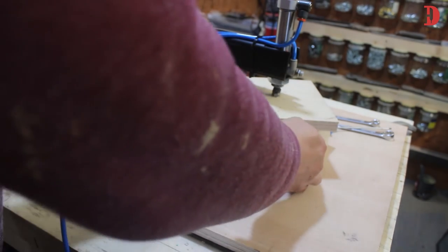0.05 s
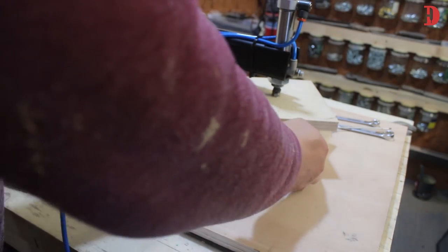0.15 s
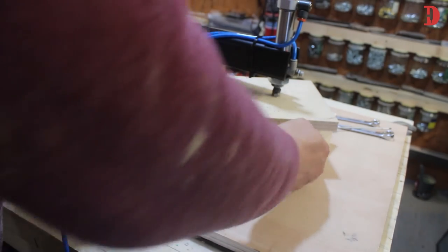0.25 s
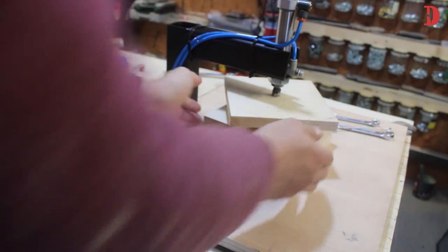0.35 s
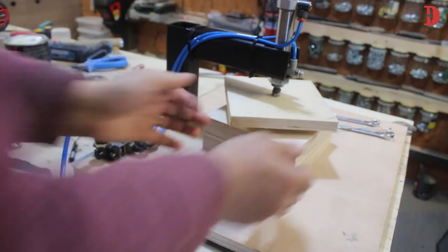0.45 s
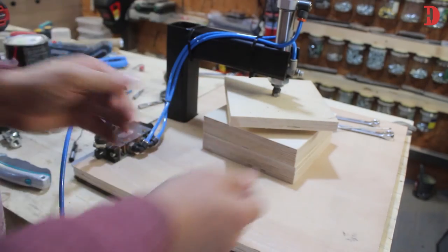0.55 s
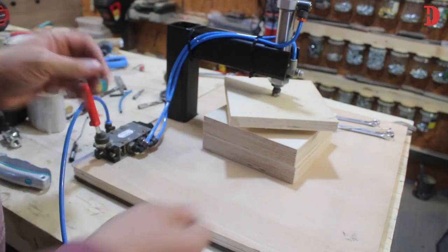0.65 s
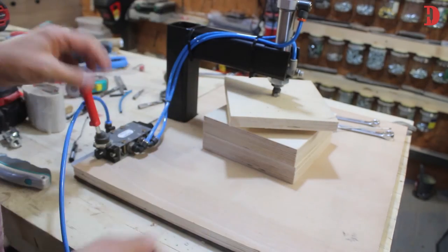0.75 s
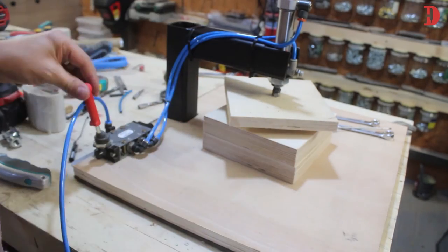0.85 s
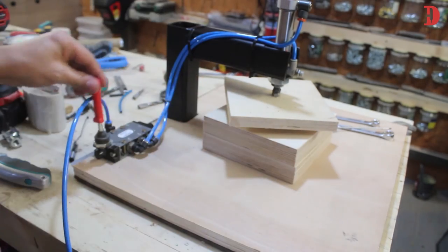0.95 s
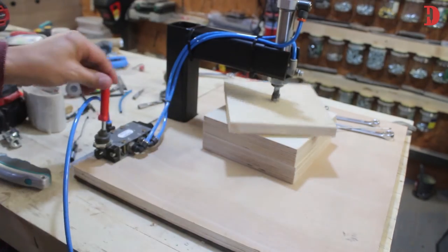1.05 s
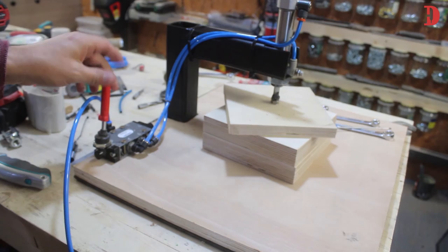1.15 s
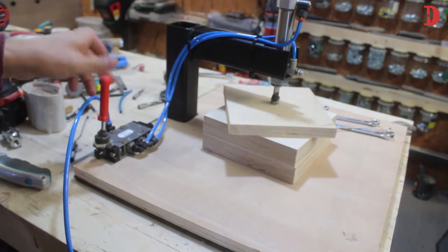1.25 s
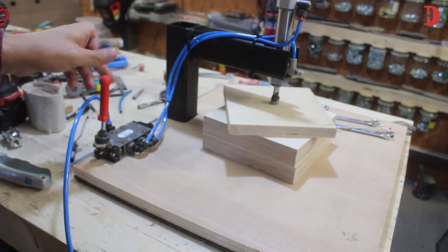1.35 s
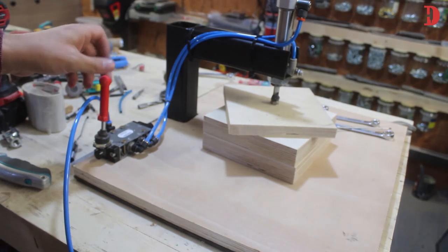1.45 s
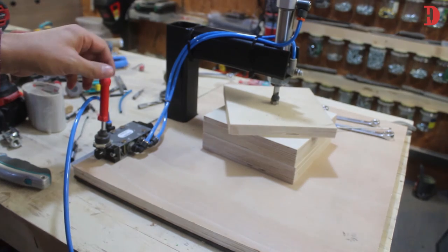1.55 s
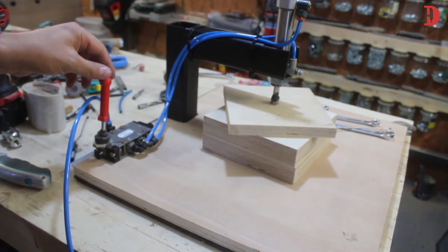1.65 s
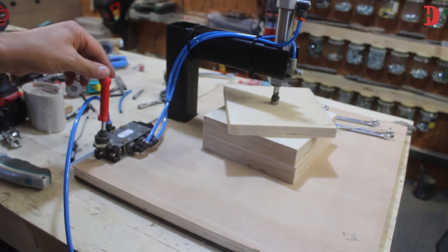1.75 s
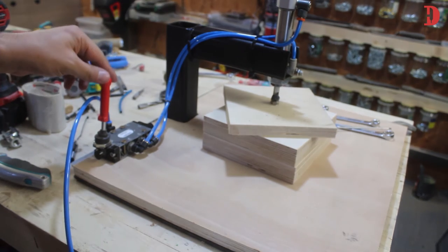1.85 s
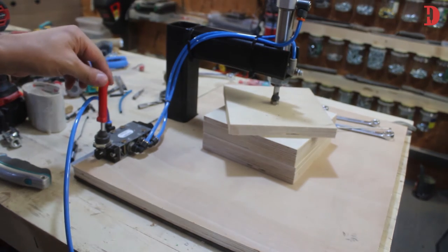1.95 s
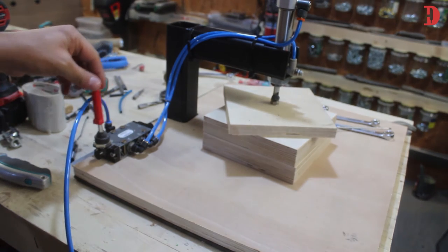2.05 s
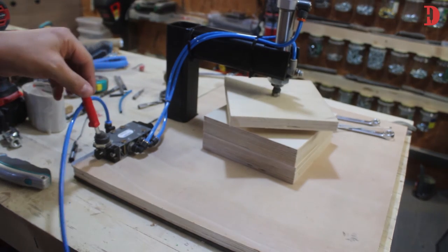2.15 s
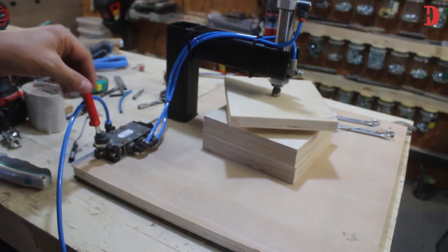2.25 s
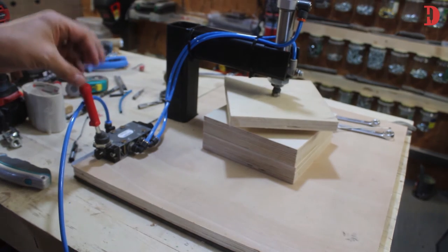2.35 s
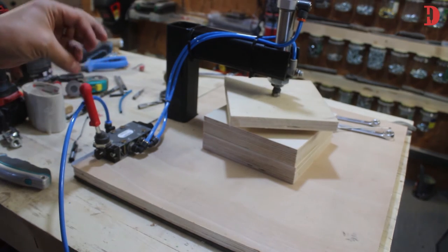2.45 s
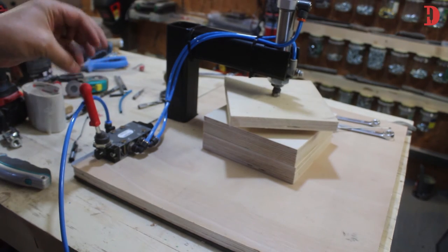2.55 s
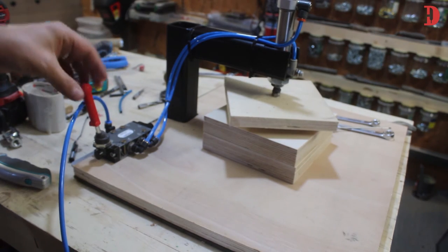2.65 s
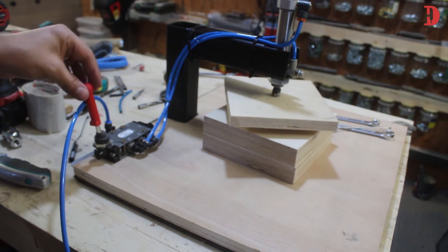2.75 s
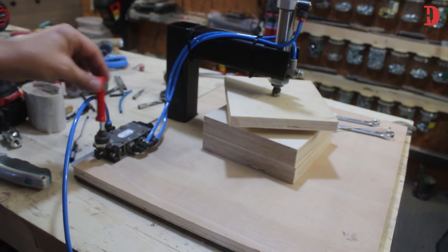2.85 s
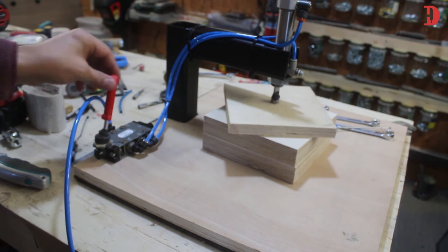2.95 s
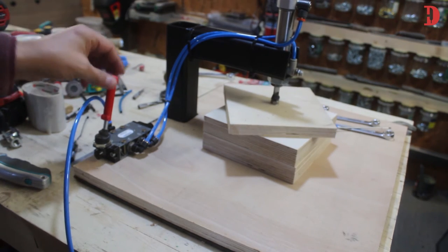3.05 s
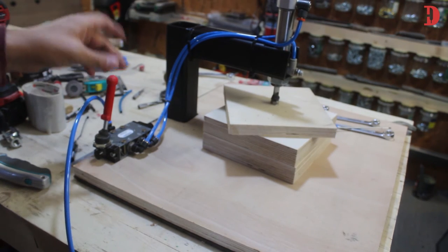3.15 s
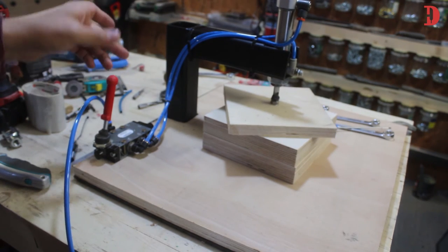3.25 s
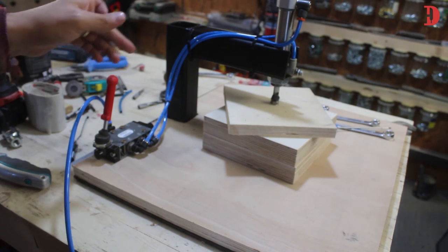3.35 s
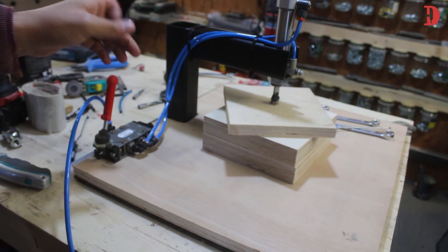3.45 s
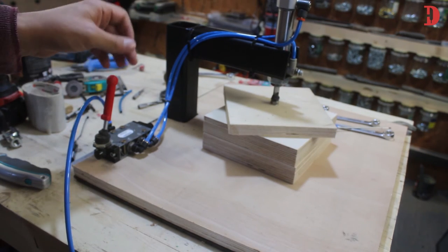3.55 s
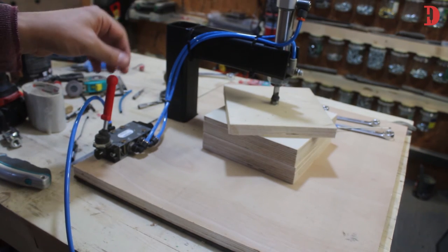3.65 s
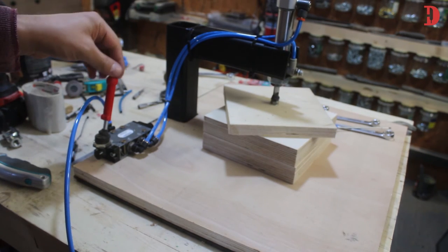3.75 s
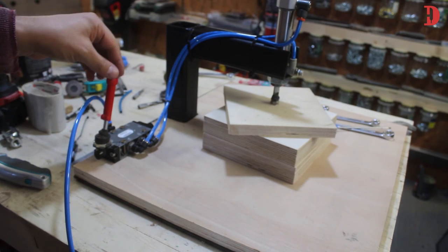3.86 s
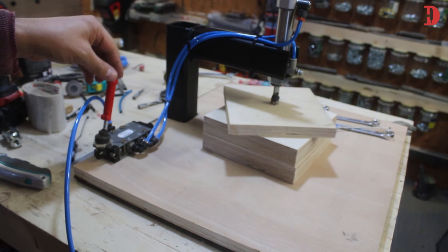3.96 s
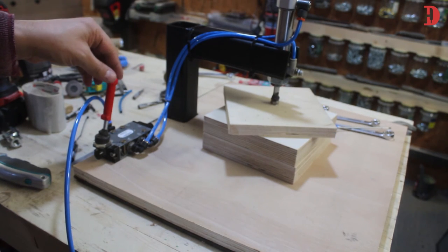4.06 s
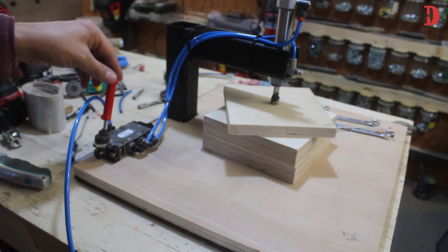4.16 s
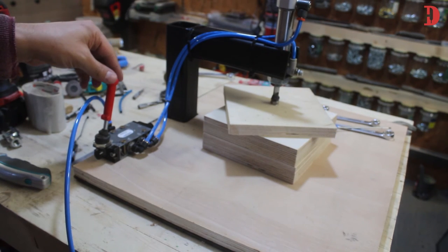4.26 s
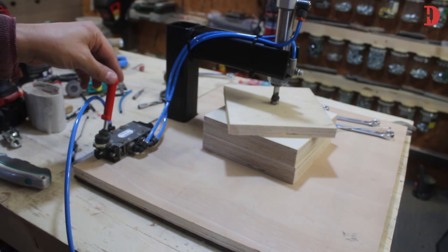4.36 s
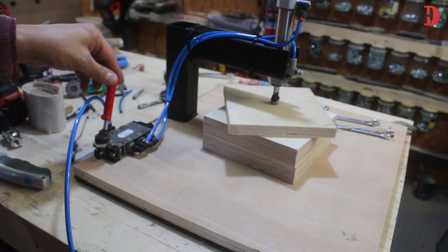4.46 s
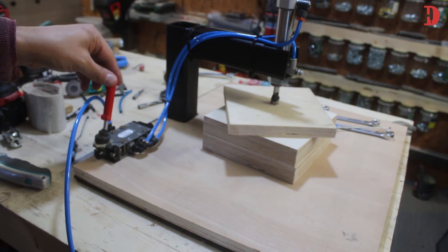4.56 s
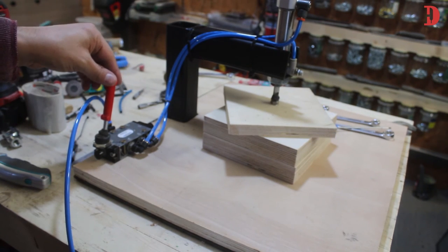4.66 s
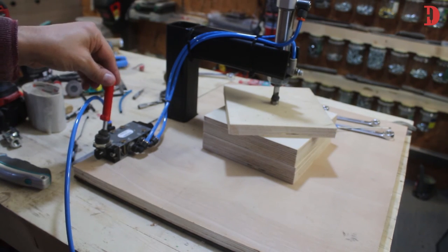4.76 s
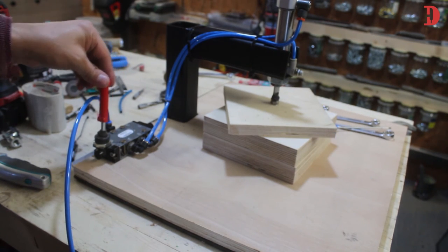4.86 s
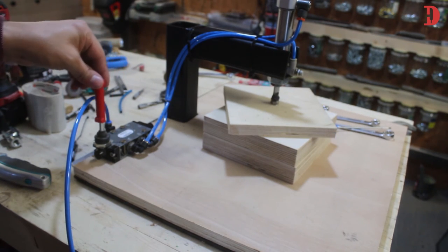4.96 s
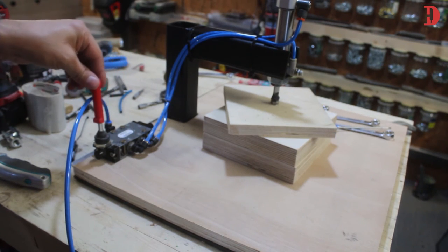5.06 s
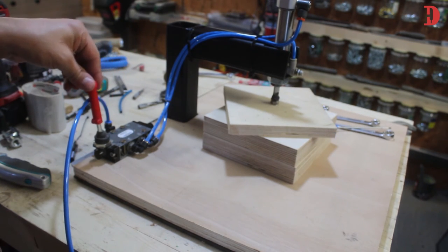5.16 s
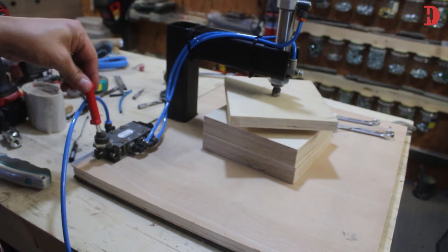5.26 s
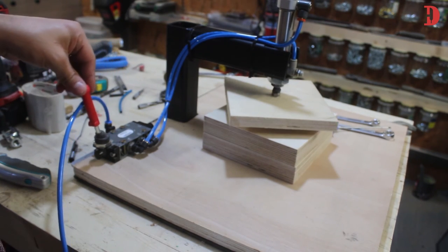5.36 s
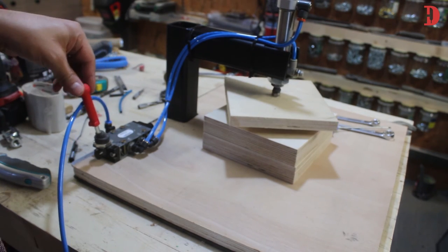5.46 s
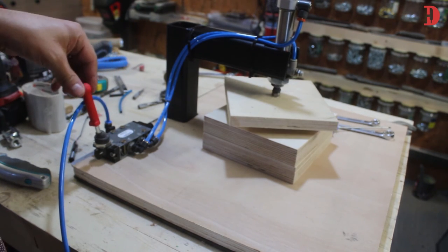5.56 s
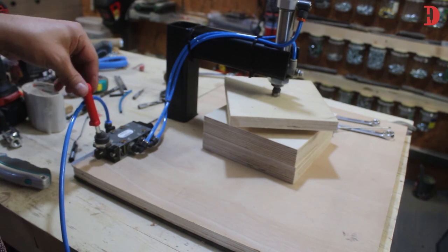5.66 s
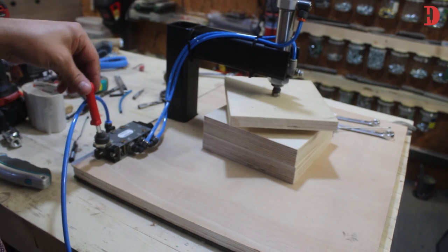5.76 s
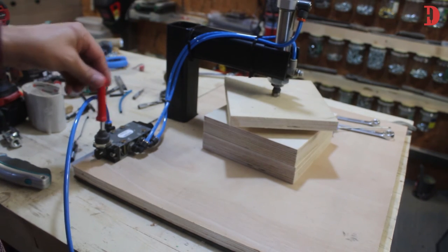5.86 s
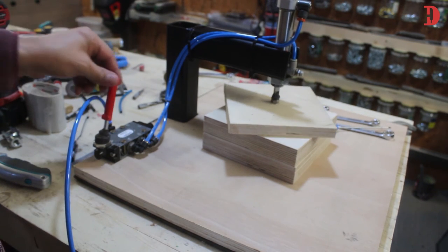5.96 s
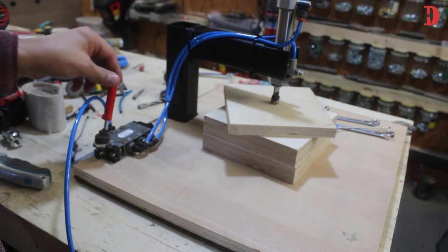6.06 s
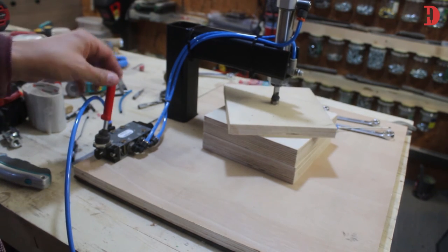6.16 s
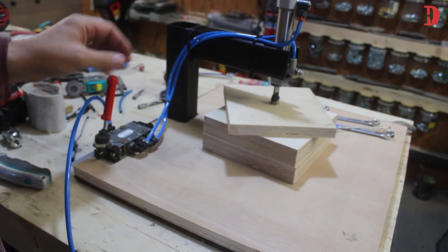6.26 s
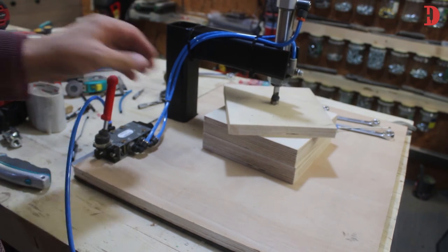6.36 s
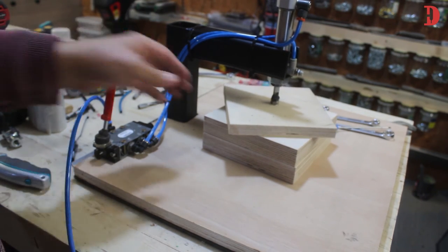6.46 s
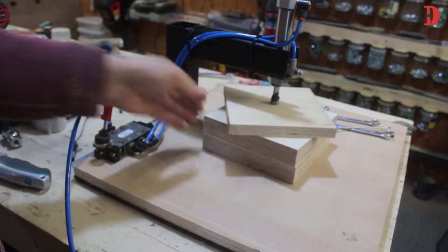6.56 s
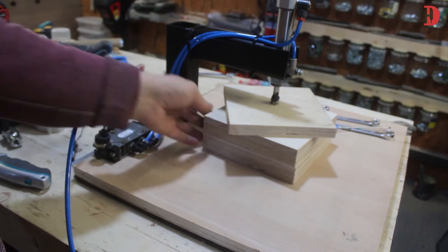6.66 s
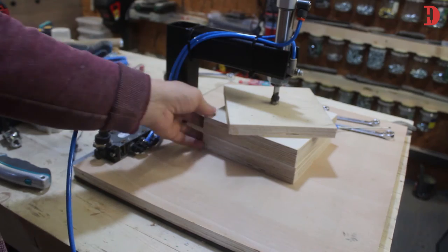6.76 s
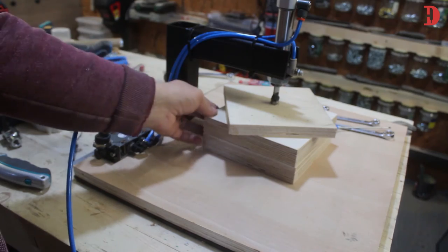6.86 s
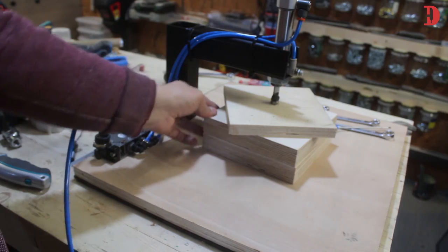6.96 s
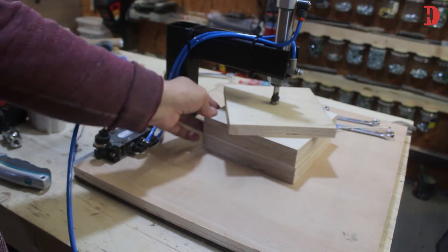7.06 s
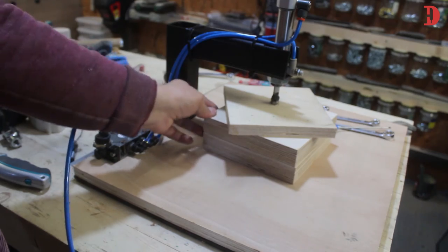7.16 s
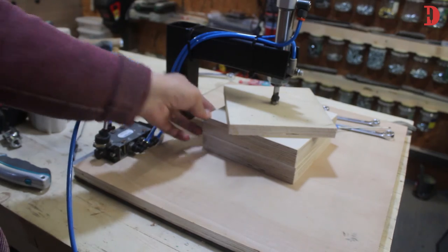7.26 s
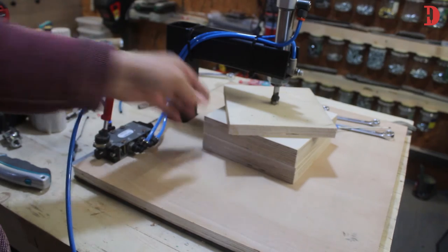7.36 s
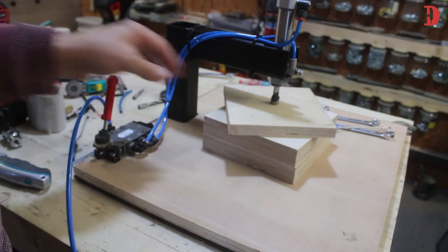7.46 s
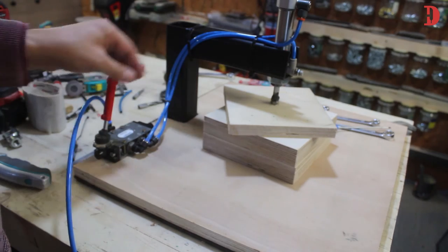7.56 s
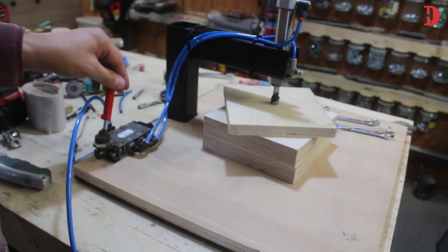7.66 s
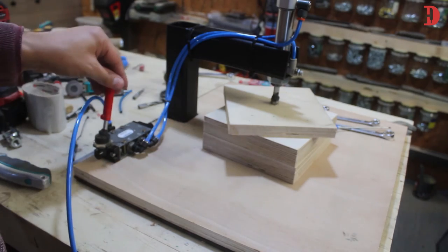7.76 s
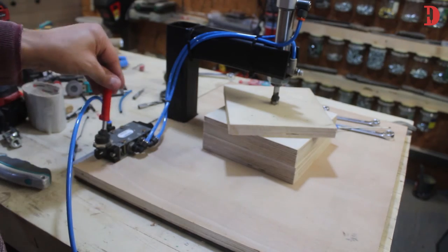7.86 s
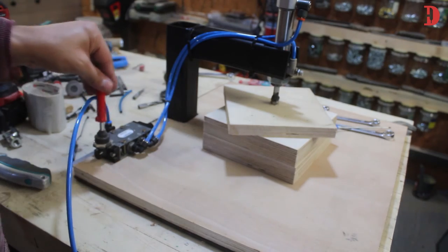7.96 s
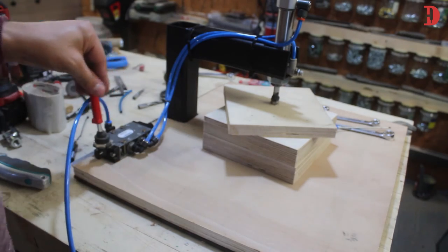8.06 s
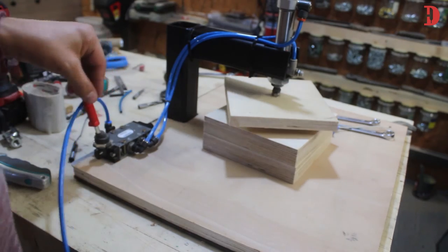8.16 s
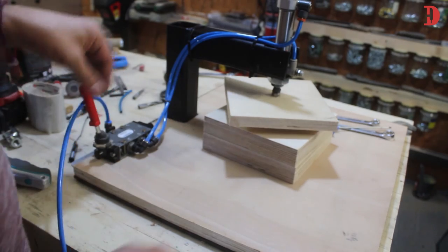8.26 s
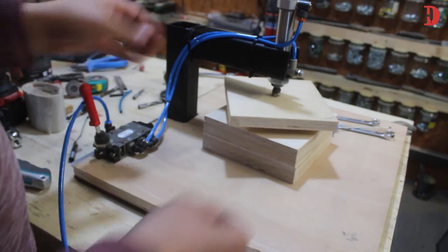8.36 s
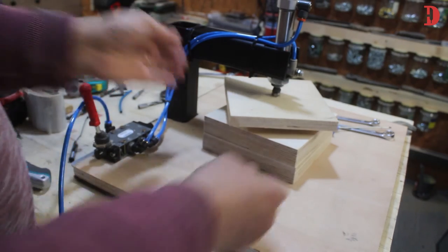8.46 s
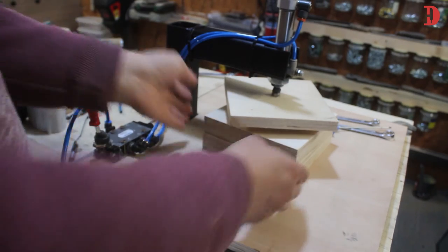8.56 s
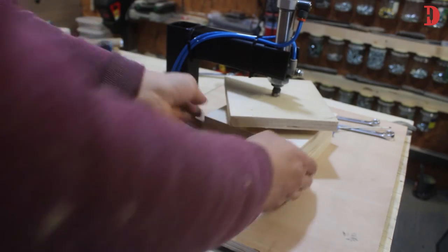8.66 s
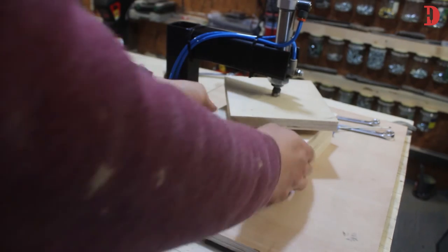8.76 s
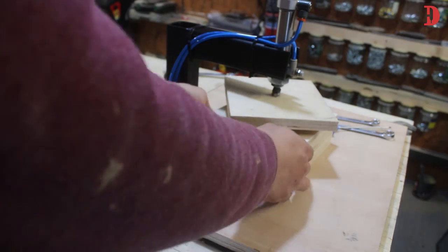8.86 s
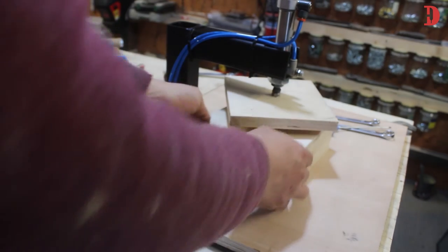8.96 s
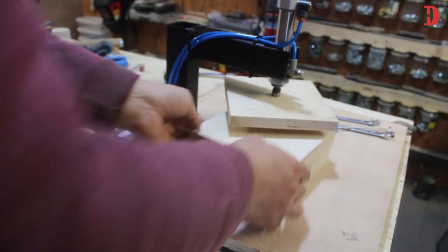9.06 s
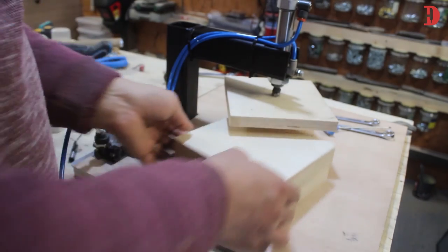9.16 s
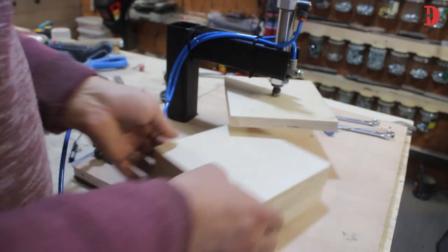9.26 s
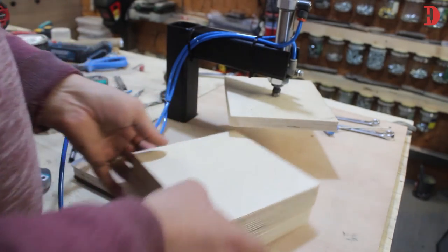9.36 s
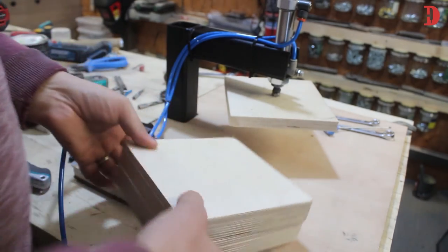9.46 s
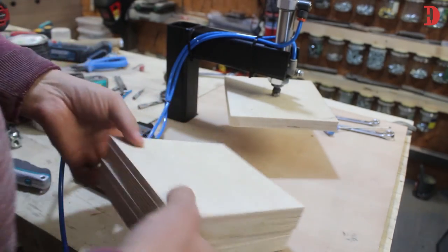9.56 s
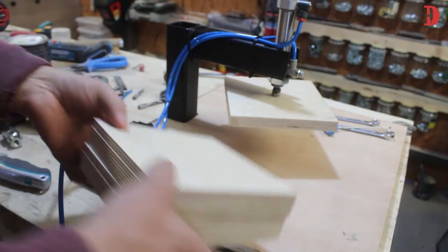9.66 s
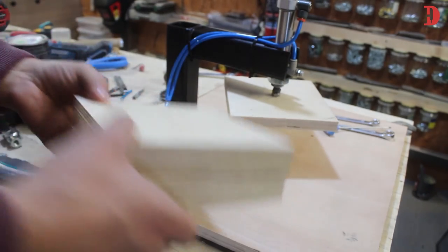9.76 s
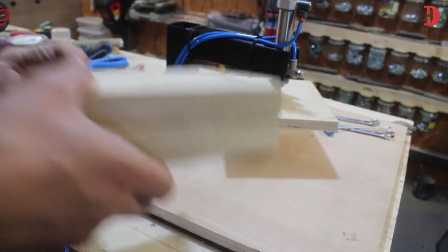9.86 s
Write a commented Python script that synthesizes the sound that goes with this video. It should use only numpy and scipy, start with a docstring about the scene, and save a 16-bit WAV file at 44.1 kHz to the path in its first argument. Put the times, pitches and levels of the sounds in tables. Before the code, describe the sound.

Three strokes of an air press heard close up on a wooden bench, in mono. Each downward stroke spits air, lands softly on wood and vents for about half a second; each return bangs far louder, air blast first, metallic crack immediately after, with a brief room tail. A throbbing motor whine continues underneath, dipping after bangs and slowly recovering. Light hand rustles come between, and a gritty wood scrape ends it.

```python
"""Air press on a workshop bench

Close on the bench, mono: a homemade air press is cycled three times by hand valve while a motor hums.
Down stroke: a spit of coloured noise, a soft landing of ringing modes, a hiss as the cylinder empties.
Return: a noise blast, then the piston slams home and the steel rings. Last, a plywood block is dragged
over the base board, as rough noise. The recorder's limiter ducks at the blasts and recovers slowly."""
import sys
import numpy as np
from scipy import signal
from scipy.fft import rfft, irfft
from scipy.io import wavfile
from scipy.ndimage import uniform_filter1d

SR = 44100
rng = np.random.default_rng(int(sys.argv[2]) if len(sys.argv) > 2 else 0)


def materialize(psi):
    """Save the field psi as 16-bit PCM at rate SR to the path in sys.argv[1].

    A 1-D psi becomes a single channel; in a 2-D psi each row is a channel.
    """
    bounded = np.clip(np.atleast_2d(psi).T, -1, 1)
    quanta = np.round(bounded * 32767).astype(np.int16)
    wavfile.write(sys.argv[1], SR, quanta)


N = 437472
T = np.arange(N) / SR

# still air of the workshop: freq_hz, level_db
AIR_COLOUR = [(20, -24), (50, -7), (110, -12.5), (200, -7), (400, -7), (700, -7), (1000, -8.5), (1800, -10),
              (4200, -16), (7000, -21.5), (8600, -30), (11000, -33.5), (14000, -47), (16000, -75)]
# workshop reverberation: freq_hz, t60_s
ROOM_T60 = [(150, 0.7), (500, 0.48), (2000, 0.38), (6000, 0.43), (14000, 0.23)]

# motor speed: time_s, turns_per_s
MOTOR_SPEED = [(0, 56.9), (.7, 57.2), (1.9, 56.5), (4.9, 57.2), (7, 56.85), (9.9, 57.3)]
# motor hum: multiple of the motor speed, rms_db
HUM = [(2, -73.5), (3, -51), (4, -68.5), (5, -69.5), (6, -58.5), (7, -62), (8, -66.5), (10, -68.5),
       (12, -67.5), (14, -63.5), (17, -61.5), (33, -77.5), (34, -65.5), (39, -81)]
# motor whine before its level wanders: multiple of the motor speed, rms_db
WHINE = [(19, -56.5), (20, -53.5), (21, -49), (22, -53.5), (23, -63), (24, -68.5), (25, -56), (26, -62.5),
         (27, -61.5)]
# fine buzz of the motor: freq_hz, level_db
BUZZ_COLOUR = [(1500, 4), (2800, -0.5), (4200, -9.5), (5000, -1), (5800, -4.5), (7000, 0), (7800, -6),
               (10000, -18), (13000, -45)]
# an arm reaches across the bench and changes the whine: centre_s, length_s, odd_partials_db, even_partials_db
REACHES = [(0.623, 0.68, -2.5, 12.5), (6.951, 1.5, 3.5, 2)]
PHASE_SPREAD_TURNS = 0.79  # how far the partials stray from pulsing together

# sleeves and hands brush about: centre_s, length_s, cloth_rustle_db, skin_hiss_db
BRUSHES = [(0.047, 0.18, -42.5, -57), (0.236, 0.18, -46, -61), (0.67, 0.43, -48, -53),
           (1.01, 0.17, -47, -52.5), (2.818, .025, -44.5, -60), (6.88, .22, -61, -58),
           (7.336, 0.14, -54, -50.5), (9.904, 0.11, -41.5, -50)]
# lever and fingers tick: start_s, level_db
TICKS = [(.926, -30.5), (1.0353, -29.5), (2.8833, -40), (8.489, -35.5)]
# the lever knocks as it is thrown: start_s, level_db
KNOCKS = [(2.129, -25), (2.934, -33), (5.239, -18), (8.142, -27)]

# how hard the block is pulled over the board, only differences between rows matter: time_s, pull_db
PULL = [(8.94, -52), (8.948, -45), (9.202, -19.5), (9.37, -20.5), (9.502, -32.5), (9.51, -24),
        (9.562, -30.5), (9.62, -30), (9.7, -47)]
# judder, scrape and grit of the block: level_db at the hardest pull, growth_db per dB of pull, tipped_change_db
RUB = [(-26, 0.3, -2), (-22, 1.08, 2.5), (-26, 1.0, -0.5)]
# block sliding flat on the board: freq_hz, level_db
FLAT_COLOUR = [(40, -53), (110, -36), (180, -17), (280, -19), (405, 8), (520, -0.5), (700, -9), (960, 0),
               (1300, 3), (2000, -1), (2600, -10), (3000, -9.5), (8000, -24.5), (13000, -56)]
# block tipped on its edge: freq_hz, level_db
EDGE_COLOUR = [(40, -46), (100, -21.5), (170, -17), (245, -2.5), (330, -7), (460, -2), (690, -9),
               (950, 2.5), (1240, -6), (1560, -1), (2400, -13.5), (4500, -21.5), (8500, -25), (13000, -58)]
# the block's edge catches: start_s, level_db, decay_s
CATCHES = [(9.318, -23, .025), (9.347, -14.5, 0.015), (9.385, -17, 0.0054), (9.43, -15, 0.015)]
# the block breaks loose, tips on its edge, and is lifted off
DRAG_START_S, TIP_S, DRAG_STOP_S, DRAG_RELEASE_S = 8.952, 9.42, 9.652, 0.013

# cylinder empties after the down stroke: start_s, length_s, level_db, tilt_db_per_octave, surge_s, surge_db
HISSES = [(1.103, 0.48, -24, -5, 1.32, 3), (2.956, 0.49, -21, -3, 3.17, 3.5),
          (5.959, 0.57, -21, -3, 6.2, 1)]
# emptying cylinder: freq_hz, level_db
HISS_COLOUR = [(80, -30), (300, -20), (1500, -18.5), (2700, -11.5), (3500, -13.5), (4600, -3.5),
               (5350, -17.5), (5950, 1), (6400, -6), (7400, -9.5), (8500, -13), (10400, -17), (11600, -14),
               (13000, -23), (14000, -53)]
# valve opens for the down stroke: start_s, level_db, hold_s, decay_s, port_resonance_hz, port_resonance_db
SPITS = [(1.0818, 2.5, 0.0016, 0.012, 2140, -8.5), (2.9397, 7.5, 0.0019, 0.009, 2170, -5.5),
         (5.9374, 8.5, 0.0034, 0.011, 2360, -10.5)]
# exhaust port on the down stroke: freq_hz, level_db
SPIT_COLOUR = [(60, -39), (500, -32), (1300, -23), (2050, -10.5), (2900, -4.5), (3350, -14), (4200, 0),
               (5300, -15.5), (5900, 3.5), (7400, -0.5), (8500, -5), (9300, -11), (11400, -10),
               (13000, -33), (15500, -33)]
# valve opens for the return: start_s, level_db, rise_s, hold_s, decay_s
BLASTS = [(2.1368, 9.5, 0.0023, 0.01, 0.015), (5.24, 3, 0.017, 0.029, 0.033),
          (8.1447, 6, 0.0049, 0.013, 0.019)]
# exhaust port on the return: freq_hz, level_db
BLAST_COLOUR = [(40, -39), (300, -28.5), (1400, -29.5), (2000, -13.5), (2800, -9), (3450, -22.5),
                (4600, -9.5), (5300, -17), (5900, 0), (7700, -4), (8600, -15), (10600, -20.5), (12500, -36),
                (15500, -43)]

# piston reaches the end of its travel: start_s, level_db, contact_brightness_hz, steel_ring_db, favoured_ring_hz
BLOWS = [(1.133, -13, 970, 0, 6000), (2.1732, 15.5, 6500, 3, 6800), (2.985, -7.5, 705, 0, 6000),
         (5.2906, 17, 6100, 1, 6200), (5.988, -9.5, 715, -6, 5960), (8.1855, 13, 6000, -2.5, 9000)]
# frame and bench thud, the steel cylinder rings on above STEEL_HZ: freq_hz, level_db, t60_s
PRESS_MODES = [(190, -8, .17), (323, -13, .18), (400, -6, .16), (468, 0, .14), (533, -2, .13),
               (707, -2, .12), (800, -13, .1), (969, -11, .1), (1250, -1, .08), (1360, -7, .1),
               (1480, -11, .08), (1640, -7, .07), (1936, -2, .08), (2165, -11, .08), (2390, -11, .06),
               (2650, -13, .07), (2928, -12, .08), (3994, -44, 1.3), (5303, -49, 1.5), (5766, -37, 1.9),
               (6794, -19, .6), (7610, -17, .45), (8398, -27, 1.0), (10250, -9, .3), (10520, -22, .7),
               (11400, -14, .35), (13500, -21, .35)]
STEEL_HZ = 3500
# the dense crack of a blow: freq_hz, level_db
CRACK_COLOUR = [(25, -40), (60, -24), (120, -22), (180, -2), (260, 1), (500, 0), (1200, -3), (1700, -1),
                (2500, -5), (3600, -14), (7000, -17), (14000, -36)]

TOP_HZ = 15600  # the recorder keeps nothing much above this


def amp(db):
    """Decibels to gain."""
    return 10 ** (np.asarray(db) / 20)


def unit(x):
    """Scale to rms 1."""
    return x / np.sqrt(np.mean(x ** 2))


def noise(size=N):
    """White noise."""
    return rng.standard_normal(size)


def lookup(hz, points):
    """Read (Hz, value) points on a log-frequency axis."""
    f, value = np.transpose(points)
    return np.interp(np.log(np.maximum(hz, 1)), np.log(f), value)


def colour(x, points, tilt_db=0):
    """Give x a spectrum of (Hz, dB) points, tilted per octave; rms 1."""
    hz = np.fft.rfftfreq(len(x), 1 / SR)
    gain_db = lookup(hz, points) + tilt_db * np.log2(1 + hz / 1000)
    return unit(irfft(rfft(x) * amp(gain_db), len(x)))


def resonate(x, hz, width_hz):
    """One resonance, gain 1 at its centre."""
    return signal.lfilter(*signal.iirpeak(hz, hz / width_hz, fs=SR), x)


def butter(x, hz, kind, order=2):
    """Low-, high- or band-pass."""
    return signal.sosfilt(signal.butter(order, hz, kind, fs=SR, output="sos"), x)


def curves(table):
    """The columns of a (time_s, ..) table at every sample."""
    s, *columns = np.transpose(table)
    return [np.interp(T, s, c) for c in columns]


def add(out, s, x):
    """Mix x into out from time s."""
    i = max(int(s * SR), 0)
    out[i:i + len(x)] += x[:N - i]


def flutter(size, per_s, depth_db):
    """Gain that wanders between random dB values, per_s of them a second."""
    knots = noise(int(400 * size / SR) + 2)
    return amp(depth_db * np.interp(np.arange(size) / SR * per_s, np.arange(len(knots)), knots))


def swell(s, length):
    """A smooth bump in time, 1 at s; length spans its 1/e points."""
    return np.exp(-(2 * (T - s) / length) ** 2)


def workshop_air():
    """The air of the workshop: faint coloured noise with a slight flutter."""
    return amp(-48.5) * colour(noise(), AIR_COLOUR) * flutter(N, 19, depth_db=0.5)


def motor():
    """A steady motor: low hum, a whine that throbs once a turn, and a fine buzz of high harmonics."""
    turn = np.cumsum(curves(MOTOR_SPEED)[0]) / SR

    def partial(k):
        return np.sin(2 * np.pi * (k * turn + PHASE_SPREAD_TURNS * rng.random()))

    hum = sum(amp(db) * partial(k) for k, db in HUM)

    odd_db = sum(db * swell(s, length) for s, length, db, _ in REACHES)
    even_db = sum(db * swell(s, length) for s, length, _, db in REACHES)
    whine = np.zeros(N)
    for k, db in WHINE:
        reach_db = odd_db if k % 2 else even_db
        # shifting reflections move each partial in level
        whine += amp(db + reach_db) * flutter(N, 1.09, depth_db=2.8) * partial(k)

    # one random waveform, repeated every turn
    one_turn = noise(size=775)
    repeated = np.interp(turn % 1, np.linspace(0, 1, len(one_turn)), one_turn)
    buzz = unit(butter(colour(repeated, BUZZ_COLOUR), 2200, "high"))
    return np.sqrt(2) * (hum + whine) + amp(-53.5) * buzz


def hands():
    """Soft brushes of cloth and skin as swells of band noise, and small resonant ticks at the lever."""
    cloth = unit(butter(noise(), (226, 860), "band"))
    skin = unit(butter(noise(), (2980, 8050), "band"))
    out = np.zeros(N)
    for s, length, cloth_db, skin_db in BRUSHES:
        out += swell(s, length) * (amp(cloth_db) * cloth + amp(skin_db) * skin)
    out *= flutter(N, 70, depth_db=2.0)
    t = T[:SR // 20]
    for s, db in TICKS:
        tick = unit(resonate(noise(len(t)), 5440, 2600))
        add(out, s, amp(db) * tick * np.exp(-t / 0.0018))
    return out


def lever():
    """The valve spool jumps and gives the board a dull little knock."""
    out, t = np.zeros(N), T[:SR // 10]
    for s, db in KNOCKS:
        thud = unit(butter(noise(len(t)), [170, 800], "band"))
        add(out, s, amp(db) * thud * np.minimum(t / 0.0049, 1) * np.exp(-t / 0.0076))
    return out


def block():
    """Wood fibres catch and slip in dense tiny clicks, louder and brighter with pull; tipping changes the tone."""
    pull_db, = curves(PULL)
    pull_db = pull_db - pull_db.max()
    onset = np.clip((T - DRAG_START_S) / 0.015, 0, 1)
    contact = onset * np.exp(-np.maximum(T - DRAG_STOP_S, 0) / DRAG_RELEASE_S)
    tipped = np.clip(.5 + (T - TIP_S) / 0.046, 0, 1)
    # it rocks on its edge until it is under way
    rocking = np.clip(1 - (T - DRAG_START_S) / .22, 0, 1)
    edge_angle = np.maximum(tipped, rocking) * np.pi / 2

    slips = noise() * np.exp(.5 * noise())
    flat = colour(slips, FLAT_COLOUR)
    edge = colour(slips[::-1], EDGE_COLOUR)
    rub = np.cos(edge_angle) * flat + np.sin(edge_angle) * edge

    judder = butter(rub, 650, "low", order=4)
    scrape = butter(rub, [650, 2500], "band", order=4)
    grit = butter(rub, 2500, "high", order=4)
    out = np.zeros(N)
    for band, (db, growth, tip_db) in zip((judder, scrape, grit), RUB):
        level_db = db + growth * pull_db + tip_db * tipped
        out += unit(band) * amp(level_db) * flutter(N, 70, depth_db=1.0)
    out *= contact * flutter(N, 130, depth_db=1.6)

    t = T[:SR // 6]
    for s, db, decay in CATCHES:
        catch = colour(noise(len(t)), EDGE_COLOUR, tilt_db=-1.5)
        add(out, s, amp(db) * catch * np.minimum(t / .001, 1) * np.exp(-t / decay))
    return butter(out, [94, 11000], "band")


def venting():
    """The lower chamber runs empty as a fading hiss; the creeping piston pushes out a surge."""
    out, t = np.zeros(N), T[:SR]
    for s, length, db, tilt_db, surge_s, surge_db in HISSES:
        pressure = np.maximum(1 - t / length, 0) ** 1.64 * np.minimum(t / 0.0058, 1)
        surge = amp(surge_db * np.exp(-((s + t - surge_s) / 0.065) ** 2))
        hiss = colour(noise(SR), HISS_COLOUR, tilt_db) * flutter(SR, 58, depth_db=1.4)
        add(out, s, amp(db) * pressure * surge * hiss)
    return out


def puff(s, rise, hold, decay, seep_db):
    """Port flow from 20 ms before s: air seeps past the moving spool, the port opens, the pressure dies away."""
    t = T[:SR // 3] - .02
    seep = amp(seep_db) * np.exp(np.minimum(t, 0) / 0.0022)
    opening = np.maximum(np.clip(t / rise, 0, 1) ** 2, seep)
    return s + t[0], opening * np.exp(-np.maximum(t - rise - hold, 0) / decay)


def valve():
    """Turbulent air bursts out of the exhaust ports each time the lever is thrown."""
    out = np.zeros(N)
    for s, db, hold, decay, port_hz, port_db in SPITS:
        start, flow = puff(s, 0.0038, hold, decay, seep_db=-39.5)
        size = len(flow)
        port = unit(resonate(resonate(noise(size), port_hz, 370), port_hz, 370))
        jet = colour(noise(size), SPIT_COLOUR) + amp(port_db) * port
        add(out, start, amp(db) * flow * jet * flutter(size, 300, depth_db=1))
    for s, db, rise, hold, decay in BLASTS:
        start, flow = puff(s, rise, hold, decay, seep_db=-28)
        size = len(flow)
        jet = colour(noise(size), BLAST_COLOUR)
        add(out, start, amp(db) * flow * jet * flutter(size, 250, depth_db=1.2))
    return out


def piston():
    """Each end stop is a crack that rings the press; landing on wood is softer and duller than steel on steel."""
    out, t = np.zeros(N), T[:2 * SR]
    hz, mode_db, t60 = np.transpose(PRESS_MODES)[:, :, None]
    modes = np.sin(2 * np.pi * hz * t) * amp(mode_db - 60 * t / t60)
    crack_fade = np.exp(-t / .007) + amp(-28) * np.exp(-t / .04)
    for s, db, bright_hz, steel_db, favoured_hz in BLOWS:
        # where the piston seats decides which steel modes speak
        seat_db = (hz > STEEL_HZ) * (steel_db - 6 * np.abs(np.log2(hz / favoured_hz)))
        strike_gain = amp(seat_db + noise(hz.shape)) * rng.choice([-1, 1], hz.shape)
        ring = np.sum(modes * strike_gain, axis=0)
        crack = colour(noise(len(t)), CRACK_COLOUR) * crack_fade
        blow = amp(-10) * ring + amp(-1) * crack
        add(out, s, amp(db) * butter(blow, min(bright_hz, 20000), "low"))
    return butter(out, 80, "high", order=2)


def room(x, wet_db):
    """Bench and shelves answer within milliseconds; octave bands of noise decay at their own rates."""
    t = T[:SR]
    tail = np.zeros(SR)
    for lo in 60 * 2. ** np.arange(9):
        band = butter(noise(SR), [lo, min(2 * lo, 20000)], "band")
        tail += band * amp(-60 * t / lookup(lo * np.sqrt(2), ROOM_T60))
    tail *= np.clip((t - .003) / 0.00081, 0, 1)
    tail /= np.sqrt(np.sum(tail ** 2))
    return x + amp(wet_db) * signal.fftconvolve(x, tail)[:N]


def scene():
    """The workshop, the handling and the press, each with its share of the room."""
    background = workshop_air() + motor()
    handling = room(hands() + lever() + block() + venting(), wet_db=-8.0)
    bursts = room(valve(), wet_db=-17.5)
    blows = room(piston(), wet_db=-11.5)
    return (background + handling + bursts + blows)[None]


def limiter(x, ceiling_db, fast_db_per_s, slow_db_per_s, slow_depth_db, attack_s):
    """Gain drops quickly when the level passes the ceiling; it climbs back fast from a deep cut, then slowly."""
    power = uniform_filter1d(x ** 2, SR // 150)
    over = np.maximum(10 * np.log10(np.abs(power) + 1e-12) - ceiling_db, 0)

    def release(db, rate):
        # hold each peak of the cut, sinking at a steady rate
        return np.maximum.accumulate(db + rate * T) - rate * T

    fast_cut = release(over, fast_db_per_s)
    slow_cut = release(np.minimum(over, slow_depth_db), slow_db_per_s)
    k = 1 - np.exp(-1 / (attack_s * SR))
    cut_db = signal.lfilter([k], [1, k - 1], np.maximum(fast_cut, slow_cut))
    return x * amp(-cut_db)


def record(dry):
    """The recorder: limiter, clipping at full scale and a steep cut of the top."""
    y = limiter(dry[0], ceiling_db=-7.5, fast_db_per_s=51, slow_db_per_s=22.5,
                slow_depth_db=16, attack_s=0.0014)
    y = np.clip(y, -1, 1)
    return signal.sosfilt(signal.ellip(8, .2, 70, TOP_HZ, fs=SR, output="sos"), y)[None]


dry = scene()
out = record(dry)
materialize(out)
```